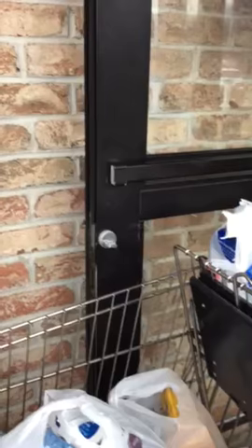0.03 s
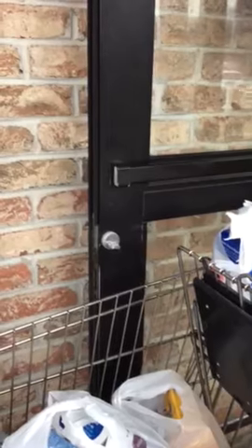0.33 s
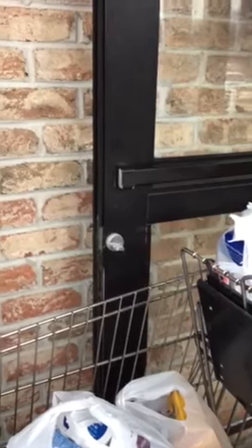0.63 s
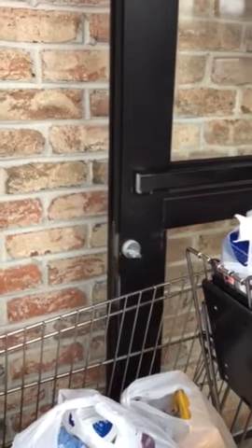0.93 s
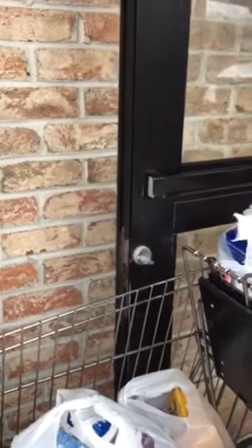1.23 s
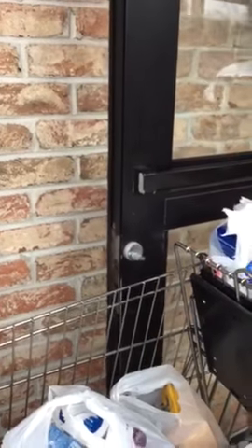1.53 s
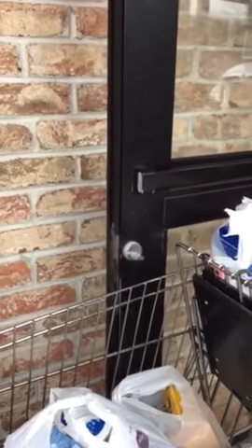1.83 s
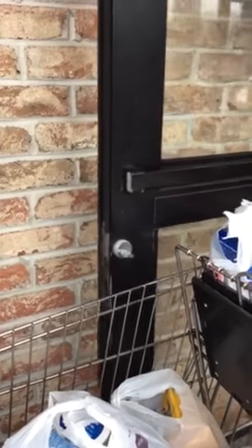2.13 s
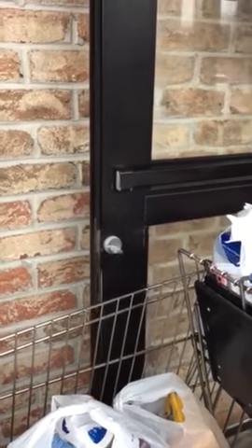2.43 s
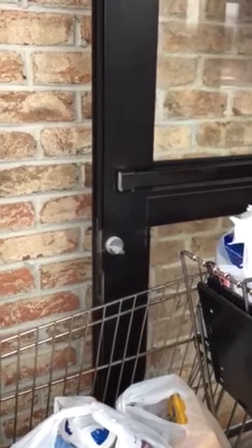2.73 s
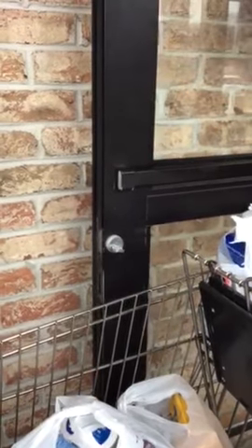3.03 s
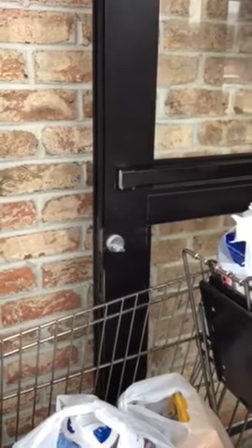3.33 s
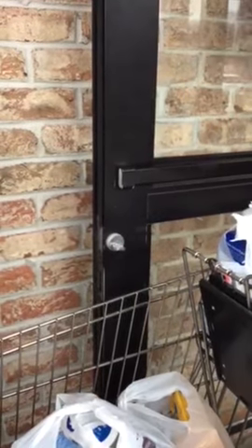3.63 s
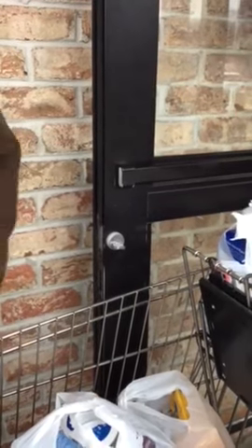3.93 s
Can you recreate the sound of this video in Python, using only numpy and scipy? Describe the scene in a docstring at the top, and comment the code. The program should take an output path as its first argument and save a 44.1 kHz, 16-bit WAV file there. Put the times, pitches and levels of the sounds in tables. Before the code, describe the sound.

A shopping cart hits a glass door with one sharp, clashing clunk at a shop entrance. Then a throbbing engine rises over steady traffic, with small cart rattles, ticks and rubbing near the microphone, strongest at the end.

```python
"""A wash of traffic, with something rubbing close to the microphone, strongest at the end.
A wire shopping cart knocks once against a metal-framed glass door: the basket wires clash, the pane thuds.
Outside, a big engine pulls away, its uneven firing making the exhaust throb.
Loose cart parts rattle among a few squeaks and ticks; the brick entrance adds a short tail to the cart."""
import sys
import numpy as np
from scipy import signal
from scipy.fft import rfft, irfft, next_fast_len
from scipy.io import wavfile
from scipy.ndimage import map_coordinates

SR = 44100
rng = np.random.default_rng(int(sys.argv[2]) if len(sys.argv) > 2 else 0)


def file_out(sig):
    """Save sig as 16-bit WAV at sys.argv[1]."""
    # one column per channel
    cols = np.atleast_2d(sig).T
    # limit, then scale
    lim = np.clip(cols, -1, 1)
    pcm = np.round(lim * 32767).astype(np.int16)
    wavfile.write(sys.argv[1], SR, pcm)


N = 176400
t = np.arange(N) / SR
# Sliding friction spectrum. Each row: frequency in Hz, relative level in dB.
FRICTION_SPECTRUM = [(350, -6), (850, -8), (1900, -3), (2600, -8), (3900, -5), (4800, -8), (8500, -9.5),
                     (10700, -15), (17000, -18.5)]


def amp(db):
    """Decibels to gain."""
    return 10 ** (np.asarray(db) / 20)


def unit(x):
    """Scale to rms 1."""
    return x / np.sqrt(np.mean(x ** 2) + 1e-20)


def along(points, hz):
    """Interpolate (Hz, value) points on a log frequency axis."""
    knots_hz, values = np.transpose(points)
    return np.interp(np.log(hz + 1), np.log(knots_hz + 1), values)


def curves(rows):
    """One value per sample for each column after the time."""
    times_s, *columns = np.transpose(rows)
    return [np.interp(t, times_s, column) for column in columns]


def wobble(knots_per_s):
    """Smooth random curve, deviation about 1."""
    return map_coordinates(rng.standard_normal(8192), [t * knots_per_s], mode="wrap")


def filtered(x, response):
    """Apply response(hz) to the spectrum of x."""
    size = next_fast_len(len(x) + 8192)
    return irfft(rfft(x, size) * response(np.fft.rfftfreq(size, 1 / SR)), size)[:len(x)]


def noise(spectrum, size=N):
    """Coloured noise of rms 1."""
    return unit(filtered(rng.standard_normal(size), lambda hz: amp(along(spectrum, hz))))


def band_decay(x, t60_curve):
    """Fade each band of x at its own rate."""
    hz, time_s, bands = signal.stft(x, SR, nperseg=256)
    decay = np.exp(-np.log(1000) * time_s / along(t60_curve, hz)[:, None])
    return signal.istft(bands * decay, SR)[1][:len(x)]


def fade(t60_s):
    """One second of exponential decay."""
    return np.exp(-np.log(1000) * t[:SR] / t60_s)


def held(start_s, length_s, rise_s, fall_s):
    """Rise, hold and release envelope."""
    age_s = np.maximum(t - start_s, 0)
    return (1 - np.exp(-age_s / rise_s)) * np.exp(-np.maximum(age_s - length_s, 0) / fall_s)


def ring(modes, scatter_db, spread_cycles):
    """One second of struck modes, levels and phases drawn anew per blow."""
    tones = np.zeros(SR)
    for hz, db, t60_s in modes:
        envelope = amp(db + scatter_db * rng.normal()) * fade(t60_s)
        tones += envelope * np.sin(2 * np.pi * (hz * t[:SR] + spread_cycles * rng.random()))
    return tones / np.sqrt(sum(amp(db) ** 2 for _, db, _ in modes) / 2)


def add(track, start_s, sound):
    """Mix a sound into the track."""
    part = track[round(start_s * SR):][:len(sound)]
    part += sound[:len(part)]


def reflections(x, max_delay_s=0.007, echo_db=-7.5):
    """Eight echoes off nearby glass and brick give a fine comb colour."""
    taps = np.zeros(SR // 20)
    delays = (rng.uniform(0.1, 1, 8) * max_delay_s * SR).astype(int)
    taps[delays] = rng.standard_normal(len(delays))
    taps *= amp(echo_db) / np.linalg.norm(taps)
    taps[0] = 1
    return signal.fftconvolve(x, taps / np.linalg.norm(taps))[:N]


def walls(x, rise_s=0.0047, tail_db=-15):
    """The brick entrance answers with a short tail, treble dying first."""
    # Each row: frequency in Hz, T60 in seconds.
    wall_decay = [(200, 1), (1500, 0.92), (4000, 0.51), (12000, 0.085)]
    tail = band_decay(rng.standard_normal(SR), wall_decay) * (1 - np.exp(-t[:SR] / rise_s))
    return amp(tail_db) * signal.fftconvolve(x, tail / np.linalg.norm(tail))[:N]


def traffic(wash_db=-37.5, rumble_db=-45.5):
    """Steady street wash over the low rumble of distant traffic."""
    # Each row of both: frequency in Hz, relative level in dB.
    wash_spectrum = [(59, -53), (100, -6), (160, -0.5), (330, 2.5), (470, -5.5), (1060, -4.5), (1800, -6.5),
                     (2500, -11), (3900, -10), (6500, -17.5), (10000, -21), (17000, -35)]
    rumble_spectrum = [(80, -39), (150, 8.5), (260, -3.5), (600, -11.5), (2000, -56)]
    wash = reflections(noise(wash_spectrum)) * amp(wash_db + wobble(6.57))
    return wash + noise(rumble_spectrum) * amp(rumble_db + 0.42 * wobble(10.7))


def rubbing(rest_db=-52, fizz_db=-25, fizz_exponent=0.71):
    """Cloth or skin slides near the microphone: strokes of grainy hiss with a restless fizz on top."""
    # Each row: start in seconds, length in seconds, level in dB.
    strokes = [(0.057, 0.095, -36), (0.216, 0.025, -36), (.445, 0.074, -38), (0.564, 0.063, -38),
               (0.684, 0.081, -34), (1.014, 0.04, -38.5), (1.059, 0.074, -34.5), (1.484, 0.12, -43.5),
               (2.127, 0.23, -43.5), (2.647, 0.16, -35.5), (3.04, 0.092, -41.5), (3.263, 0.19, -43),
               (3.386, 0.21, -29.5), (3.593, 0.42, -35), (3.714, 0.046, -28), (3.827, 0.049, -29.5),
               (3.903, 0.073, -20), (3.971, 0.11, -23)]
    # Each row: frequency in Hz, relative level in dB.
    fizz_spectrum = [(1500, -36), (5000, -20), (8500, -2), (13000, 9.5), (17000, -3)]
    power = amp(rest_db) ** 2
    for start_s, length_s, db in strokes:
        power += (amp(db) * held(start_s, length_s, rise_s=0.0065, fall_s=0.043)) ** 2
    strength = np.sqrt(power)
    hiss = noise(FRICTION_SPECTRUM) * strength * amp(2.2 * wobble(45))
    fizz = noise(fizz_spectrum) * strength ** fizz_exponent * amp(fizz_db + 4.8 * wobble(54))
    return reflections((hiss + fizz) * amp(0.41 * wobble(900)))


def engine(throb_at_s=3.598, waver_db=5, chuff_db=-39, chuff_swing_db=6.5):
    """Uneven firing makes harmonics of the cycle rate; boom and top harmonics bunch once per cycle."""
    # Each row: time in seconds, four-stroke cycle rate in Hz.
    speed = [(1.5, 9.3), (1.9, 9.8), (2.1, 10.2), (2.3, 10.4), (2.7, 10.88), (2.9, 11.17), (3.3, 11.55),
             (3.5, 11.84), (3.7, 12), (4, 12.12)]
    # Each row: time in seconds, gain in dB of all but the boom, levels in dB of boom harmonics 13 to 16.
    exhaust_levels = [(1.4, -27, -71, -76, -72, -61), (1.8, -10.5, -35, -73, -41, -38.5),
                      (2.1, -3, -38, -38, -45, -32.5), (2.45, -1.5, -37, -40, -54, -24),
                      (2.74, -0.5, -22.5, -61, -40, -24.5), (3, 1, -31.5, -37, -35, -25.5),
                      (3.27, 5, -22.5, -33, -31, -28.5), (3.6, 3.5, -20, -26.5, -31.5, -41),
                      (4, 4.5, -16.5, -26.5, -34, -43)]
    # Weak exhaust harmonics. Each row: multiple of the cycle rate, relative level in dB.
    burble_orders = [(8, -50), (10, -44.5), (11, -49), (12, -45), (18, -43), (19, -46.5), (21, -47),
                     (26, -42.5)]
    # Pipe colour and exhaust turbulence. Each row: frequency in Hz, relative level in dB.
    pipe_spectrum = [(240, -76), (285, -49.5), (320, -55.5), (358, -46), (400, -54.5), (445, -57),
                     (490, -79)]
    chuff_spectrum = [(60, -15), (180, -1), (240, -4), (380, -7), (1000, -49)]
    cycle_hz, = curves(speed)
    phase = 2 * np.pi * np.cumsum(cycle_hz) / SR
    phase -= np.interp(throb_at_s, t, phase)
    gain_db, *boom_db = curves(exhaust_levels)

    def harmonic(order, db, scatter_rad):
        """One partial, wavering in level and phase."""
        return amp(db + waver_db * wobble(5)) * np.cos(round(order) * phase + scatter_rad * wobble(1.983))

    boom = sum(amp(db) * np.sin(k * phase) for k, db in enumerate(boom_db, 13))
    burble = sum(harmonic(k, db, scatter_rad=1.1) for k, db in burble_orders)
    throb = sum(harmonic(k, along(pipe_spectrum, k * cycle_hz), scatter_rad=0.7) for k in range(23, 42))
    pulse = ((1 + np.cos(phase)) / 2) ** 2
    chuff = noise(chuff_spectrum) * amp(chuff_db + chuff_swing_db * pulse)
    return np.sqrt(2) * boom + amp(gain_db) * (np.sqrt(2) * (burble + throb) + chuff)


def squeaks_and_ticks(scuff_db=-7):
    """Short squeaks and ticks over a scuff: narrow resonances squeak, broad ones tick or crackle."""
    # Each row: start in seconds, centre in Hz, half-width in Hz, length in seconds, level in dB.
    bursts = [(0.342, 1820, 110, 0.016, -32), (.47, 5400, 150, 0.051, -39),
              (0.829, 6130, 1160, 0.015, -28.5), (1.57, 6200, 80, 0.083, -50),
              (2.091, 2380, 700, 0.037, -37), (2.406, 3830, 300, 0.024, -35),
              (2.895, 4300, 2620, 0.011, -31.5)]
    out = np.zeros(N)
    scuff = amp(scuff_db) * noise(FRICTION_SPECTRUM)
    for start_s, centre_hz, half_width_hz, length_s, db in bursts:
        peak = lambda hz: 1 / (1 + ((hz - centre_hz) / half_width_hz) ** 2)
        band = unit(filtered(rng.standard_normal(N), peak))
        out += amp(db) * (band + scuff) * held(start_s, length_s, rise_s=0.002, fall_s=0.008)
    return out


def rattles(jingle_from_s=3.45, jingle_db=-36):
    """Loose cart parts chatter against each other: separate clacks, then a light, lasting jingle."""
    # Each row: start in seconds, level in dB, T60 in seconds.
    shakes = [(1.382, -45, .02), (1.418, -25.5, 0.053), (1.514, -32.5, 0.038), (3.396, -22, 0.14),
              (3.406, -19.5, 0.15), (3.627, -26, 0.2), (3.694, -29, 0.098)]
    # Each row: resonance in Hz, bandwidth in Hz, relative level in dB.
    part_modes = [(830, 265, -1.5), (1390, 650, -6), (1870, 170, 4.5), (2410, 290, -3), (2800, 250, -0.5),
                  (4070, 1100, -11), (7800, 2300, -14)]

    def body(hz):
        """Resonances summed with alternating sign."""
        return sum((-1) ** k * amp(db) * 1j * hz * width_hz / (mode_hz**2 - hz**2 + 1j * hz * width_hz)
                   for k, (mode_hz, width_hz, db) in enumerate(part_modes))

    clacks = sum(amp(db) * held(start_s, length_s=0.0034, rise_s=0.0019, fall_s=t60_s / np.log(1000))
                 for start_s, db, t60_s in shakes)
    force = clacks + amp(jingle_db) * (t > jingle_from_s)
    chatter = rng.standard_normal(N) * amp(1.5 * wobble(250))
    return filtered(chatter * force, body) / np.std(filtered(chatter, body))


def basket(modes_db=-2, clash_db=3):
    """One ring of the cart: clear basket and frame modes over the clash of many wires."""
    # Each row: frequency in Hz, relative level in dB, T60 in seconds.
    basket_modes = [(1208, 1.5, 0.36), (1320, 4.5, 0.38), (1370, -6, .42), (1466, -3, .3), (1576, -3, 0.38),
                    (1693, 10, 0.23), (1810, -1, 0.16), (1926, 7, .2), (1960, 10, 0.13), (2667, -8.5, .4),
                    (4190, 2.5, .16), (6220, 6, 0.078)]
    # Each row: frequency in Hz, relative level in dB.
    clash_spectrum = [(65, -40), (110, -2), (200, 1.5), (318, -3.5), (421, -11), (885, -8.5), (1050, -11.5),
                      (1330, 3.5), (1970, 0.5), (3130, -4.5), (6230, -8.5), (17000, -22.5)]
    # Each row: frequency in Hz, T60 in seconds.
    clash_decay = [(300, 0.48), (1400, 0.22), (3000, 0.18), (6000, 0.15), (14000, 0.095)]
    tones = ring(basket_modes, scatter_db=-2.5, spread_cycles=0.99)
    clash = band_decay(noise(clash_spectrum, size=SR), clash_decay)
    return amp(modes_db) * tones + amp(clash_db) * clash


def knock(jolt_at_s=1.205, jolt_width_s=0.016, jolt_hz=116, jolt_db=-21.5):
    """Each contact cracks and rings the basket; the pane thuds and the door jolts in its frame."""
    # Each row: start in seconds, gain in dB, crack level relative to the ring in dB.
    contacts = [(1.1694, -15.5, 8.5), (1.178, -17.5, 0), (1.1962, -20.5, -11), (1.2, -27, 2),
                (1.205, -31, 16)]
    # Each row: frequency in Hz, relative level in dB.
    crack_spectrum = [(500, -28), (1500, -8), (4500, 10), (8000, 7), (16000, -9)]
    # The door gives under the blow. Each row: start in seconds, gain in dB.
    thuds = [(1.173, -23), (1.196, -25)]
    # Each row: frequency in Hz, relative level in dB, T60 in seconds.
    pane_modes = [(112, -5, 0.18), (144.4, 6, 0.28), (304, 5.5, 0.21), (340, -3, .3), (496, -5.5, 0.11)]
    out = np.zeros(N)
    for start_s, db, crack_db in contacts:
        wires = basket()
        crack = amp(crack_db) * noise(crack_spectrum, size=SR) * fade(t60_s=0.018)
        add(out, start_s, amp(db) * (wires + crack))
    swell = 1 - np.exp(-t[:SR] / 0.003)
    for start_s, db in thuds:
        add(out, start_s, amp(db) * ring(pane_modes, scatter_db=5.0, spread_cycles=0.96) * swell)
    offset_s = t - jolt_at_s
    jolt = np.sin(2 * np.pi * jolt_hz * offset_s) * np.exp(-(offset_s / jolt_width_s) ** 2)
    return out + amp(jolt_db) * jolt


def scene():
    """The cart in the entrance, rubbing close by, engine and street behind."""
    cart = knock() + rattles() + squeaks_and_ticks()
    return (cart + walls(cart) + engine() + rubbing() + traffic())[None]


def record(dry, low_cut_hz=92, opens_s=0.084, top_hz=17500):
    """The microphone sheds deep bass, opens after a moment, clips at full scale and is band-limited."""
    thin = filtered(dry[0], lambda hz: 1 / np.sqrt(1 + (low_cut_hz / (hz + 1)) ** 8))
    live = np.clip(thin * (t > opens_s), -1, 1)
    return filtered(live, lambda hz: hz < top_hz)[None]


dry = scene()
out = record(dry)
file_out(out)
```